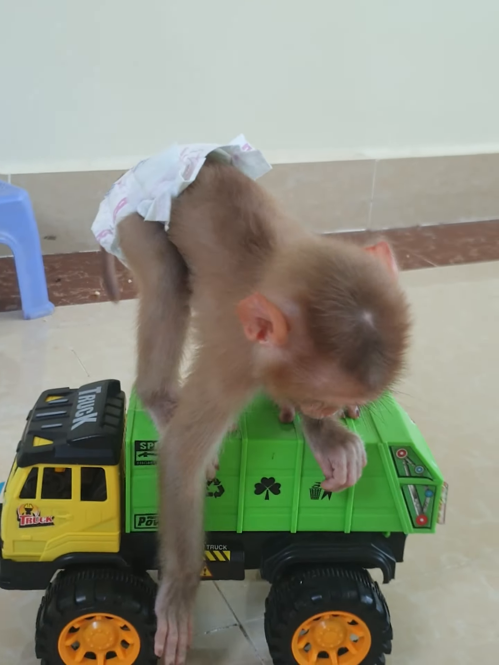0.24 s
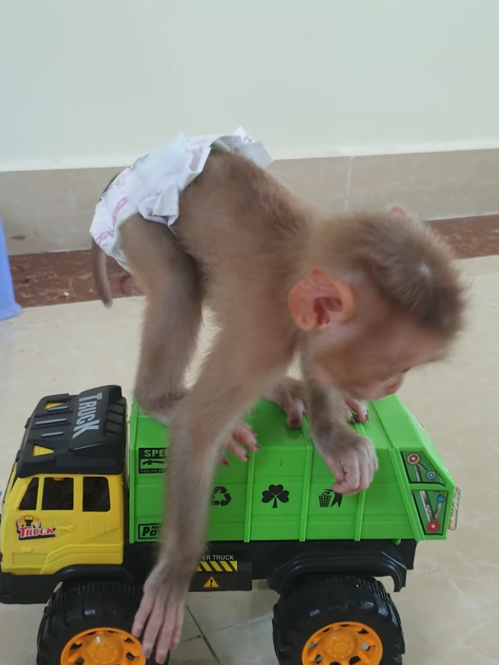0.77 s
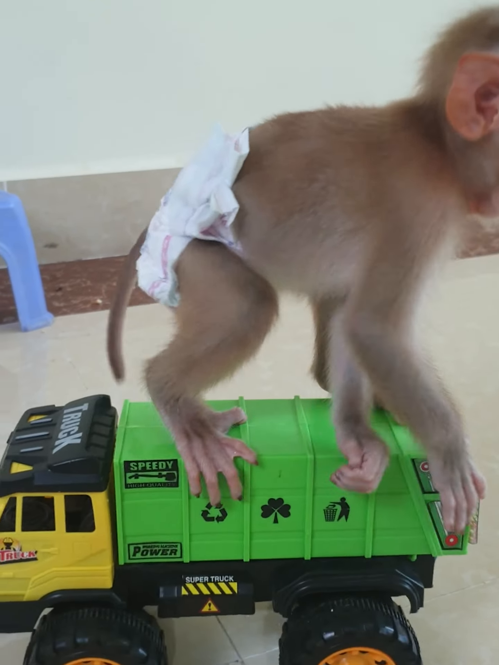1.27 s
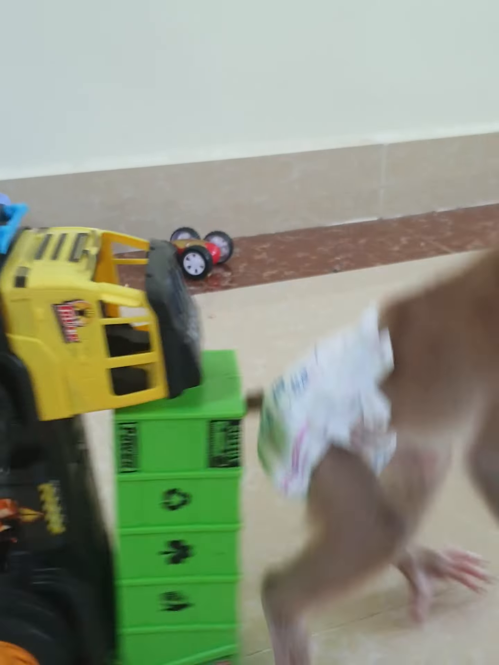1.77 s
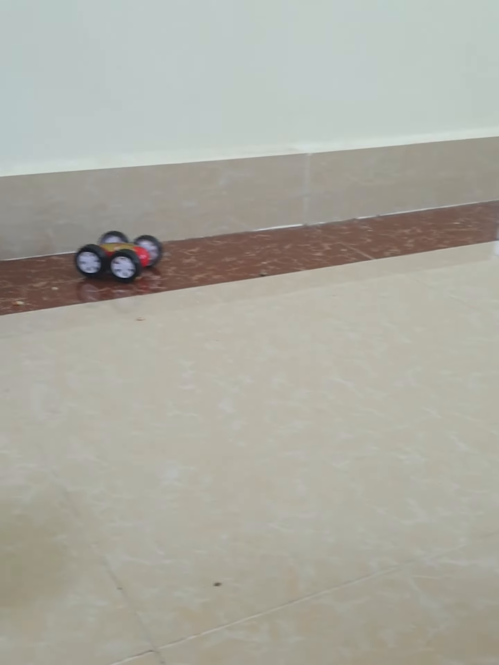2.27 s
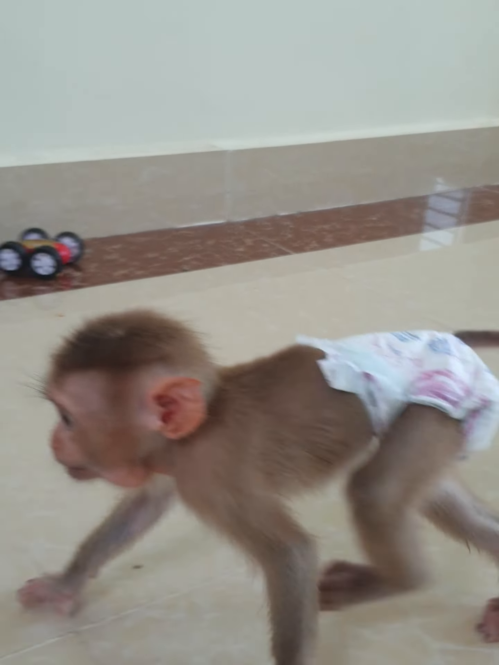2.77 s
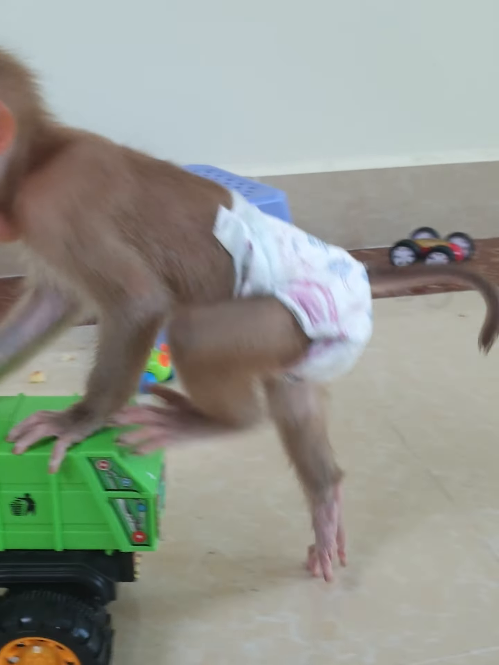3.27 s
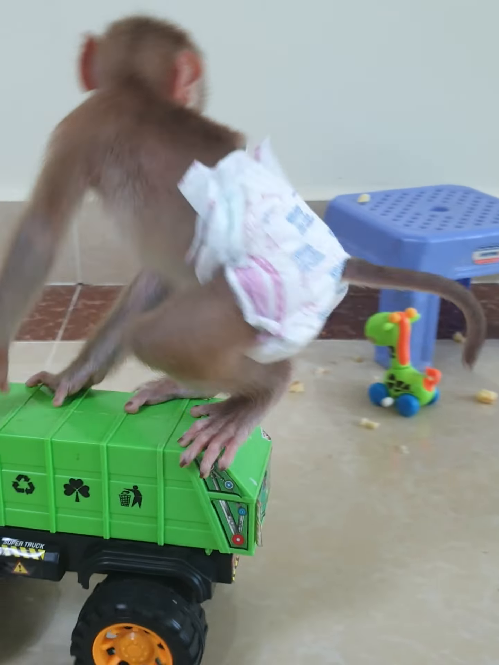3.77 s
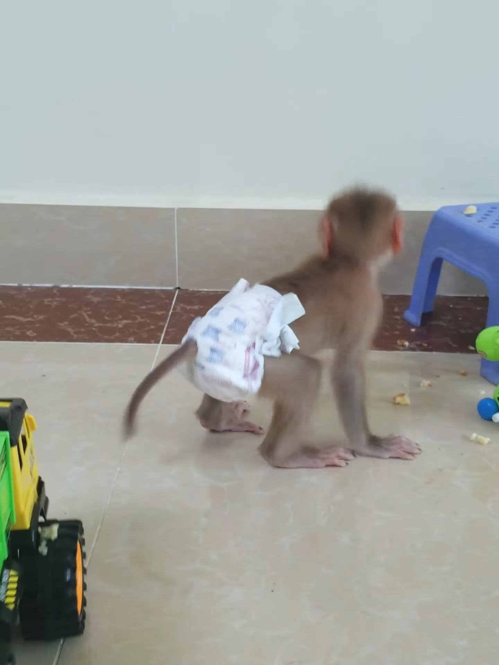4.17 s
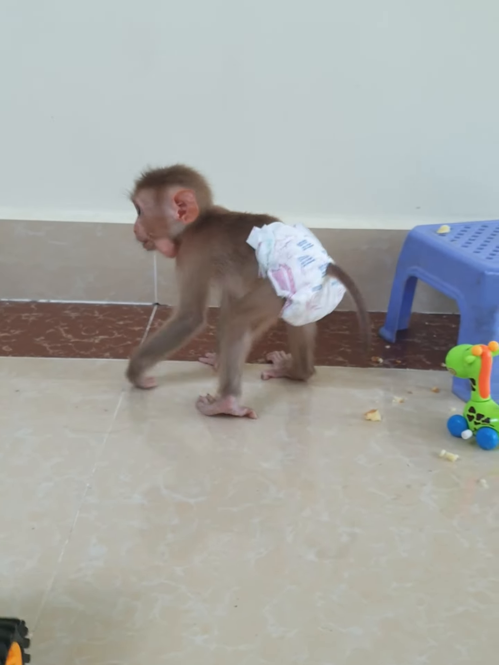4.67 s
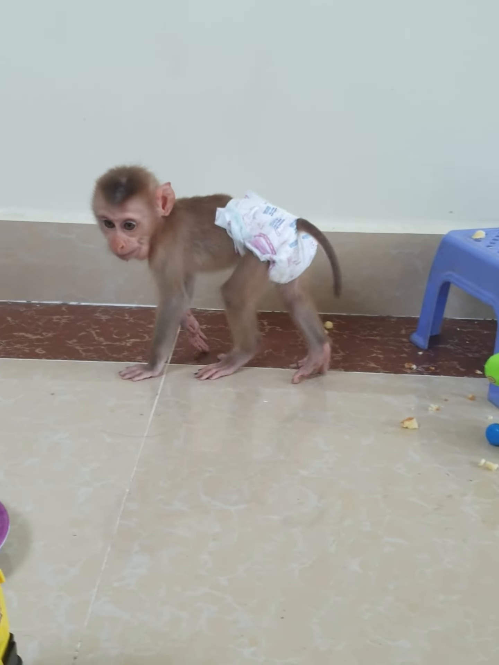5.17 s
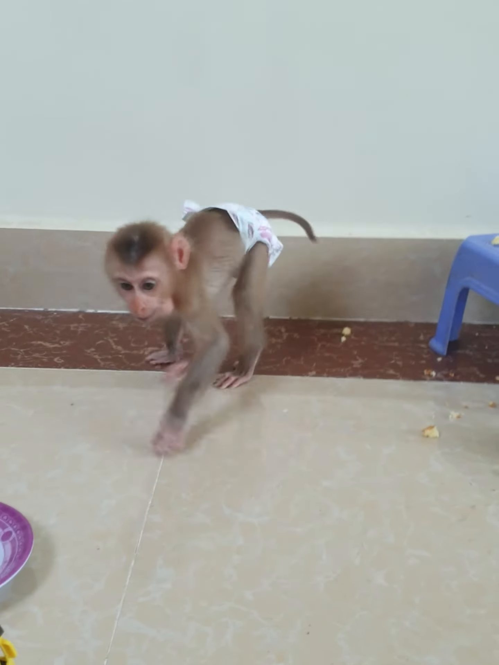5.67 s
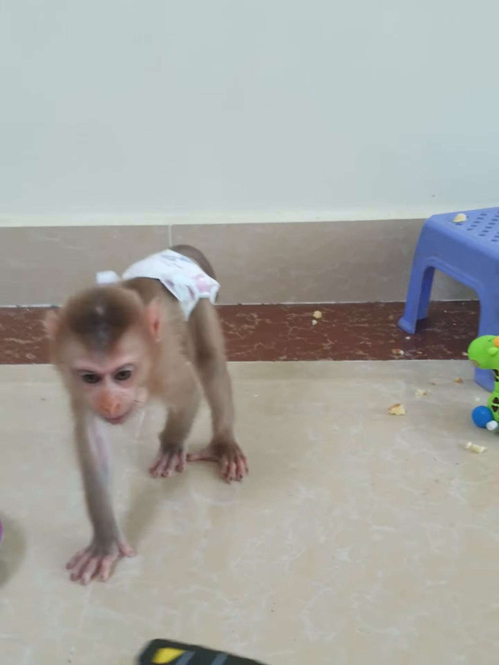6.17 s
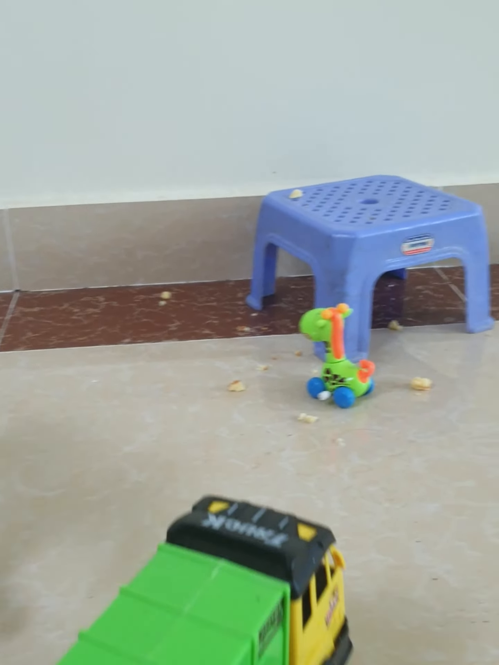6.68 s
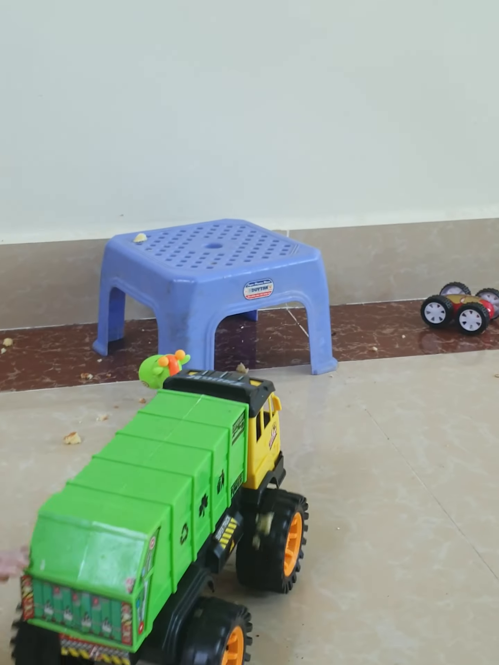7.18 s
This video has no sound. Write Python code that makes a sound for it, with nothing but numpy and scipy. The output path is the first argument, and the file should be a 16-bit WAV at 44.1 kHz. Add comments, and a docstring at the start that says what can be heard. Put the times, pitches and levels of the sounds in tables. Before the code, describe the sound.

Hollow plastic knocks and rattles ring out as a toy truck is shoved across a tiled floor, with soft handling noise between bursts.

```python
"""Toy truck on a tiled floor

A big plastic toy truck is set down, shoved and rolled in a bare, echoing room. Knocks ring its
hollow shell, a loose panel clacks and rattles, and lugged wheels rumble over the tiles.
Fingers tap and rub right at the microphone and cloth rustles, both dry and close.
A few faint, thin squeaks come through, and a low room tone lies under it all."""
import sys
import numpy as np
from scipy import signal
from scipy.fft import rfft, irfft, next_fast_len
from scipy.io import wavfile
from scipy.ndimage import uniform_filter1d

SR = 44100
rng = np.random.default_rng(int(sys.argv[2]) if len(sys.argv) > 2 else 0)


def materialize(psi):
    """Save the field psi as 16-bit PCM at rate SR to the path in sys.argv[1].

    A 1-D psi becomes a single channel; in a 2-D psi each row is a channel.
    """
    bounded = np.clip(np.atleast_2d(psi).T, -1, 1)
    quanta = np.round(bounded * 32767).astype(np.int16)
    wavfile.write(sys.argv[1], SR, quanta)


N = 328104
TIME = np.arange(N) / SR

# colour of the room tone (frequency [Hz], density [dB])
ROOM_TONE = [(15, -58.5), (28, -32.5), (45, -5), (72, -2.5), (130, -8), (220, -12.5), (320, -19.5),
             (450, -19.5), (700, -27), (1300, -36.5), (2600, -49), (4400, -52.5), (8000, -58), (12000, -52),
             (16000, -52.5)]
# its fader ride (time [s], level [dB])
ROOM_TONE_RIDE = [(0.0, -49.5), (1.24, -51.5), (1.8, -46), (2.46, -48), (2.69, -55.5), (5.39, -49),
                  (5.82, -51.5), (6.4, -46.5), (7.44, -48)]
# reverb decay (frequency [Hz], time to fall 60 dB [s])
ROOM_T60 = [(100, 0.93), (400, .9), (1000, 0.81), (2500, 0.79), (5000, 0.69), (9000, 0.7), (15000, .55)]
# colour of the walls (frequency [Hz], level [dB])
WALLS = [(60, 1), (250, -1.5), (800, -1.5), (2500, -0.5), (8000, 0), (16000, 3)]
# how alike left and right are (frequency [Hz], correlation [0-1])
LIKENESS = [(100, 0.89), (350, 0.94), (700, 0.58), (1300, 0.033), (4000, 0.027), (16000, .02)]

# colours of three kinds of cloth stroke (frequency [Hz], density [dB])
CLOTH_SLIDE = [(880, -29), (1500, -5.5), (2490, -11), (3150, -3), (4830, -13.5), (6120, -4), (7610, -11.5),
               (10900, -8), (16000, -13)]
CLOTH_BRUSH = [(2060, -21), (3500, -16), (4970, 1), (5710, -3), (6120, 3), (7800, -1), (11300, 2.5),
               (16000, -6)]
CLOTH_SWISH = [(1470, -44), (2500, -17.5), (2850, -10.5), (3490, -30), (3890, -12.5), (5610, -11.5),
               (6810, -3.5), (14700, -16), (16000, -23)]
# cloth strokes (time [s], rise [s], length [s], level [dB], kind)
STROKES = [(3.15, .03, 0.13, -73, "slide"), (3.278, 0.12, 0.39, -61.5, "slide"),
           (4.668, .02, 0.12, -72.5, "brush"), (4.816, 0.024, 0.029, -67.5, "brush"),
           (4.961, .08, 0.16, -62.5, "brush"), (5.16, .03, 0.12, -74.5, "brush"),
           (5.82, 0.18, 0.44, -61, "swish"), (6.183, .01, 0.032, -60, "brush"),
           (6.283, 0.019, 0.016, -55, "brush")]
# short squeaks (time [s], pitch [Hz], level [dB])
CHIRPS = [(0.311, 3550, -67), (0.327, 3430, -63), (0.357, 3460, -59.5), (2.937, 3617, -73.5)]

# borders of the five registers: bass, body, clack, snap, crack (frequency [Hz])
REGISTER_EDGES = [60, 450, 1300, 2900, 6500, 16000]
# top end of a tap and of a knock, against the body (clack [dB], snap [dB], crack [dB])
TAP_BALANCE = [-2, -15, -21]
KNOCK_BALANCE = [-6, -11.5, -19.5]
# balance of a panel clack (bass [dB], body [dB], clack [dB], snap [dB], crack [dB])
CLACK_BALANCE = [-16, -7.5, -0.5, -9.5, -14]

# colours of a fingertip tap and of rubbing skin (frequency [Hz], density [dB])
TAP_COLOUR = [(60, -16), (200, 6.5), (380, -3), (530, 3.5), (740, -11.5), (1050, -5), (2800, 0),
              (3700, -13.5), (6000, -15), (8000, -16), (13000, -2), (16000, -20)]
RUB_COLOUR = [(60, 7.5), (150, 2.5), (380, -5.5), (520, -3.5), (750, -16), (1050, -5), (1600, -6.5),
              (2600, -3.5), (3200, -12.5), (4000, -19), (7000, -26.5), (16000, -29)]
# finger taps (time [s], level [dB], hardness [dB/register], bass [dB], left against right [dB])
TAPS = [(4.689, -52.5, 0.5, -3, -10), (4.715, -50, -8, -6, -12), (4.742, -57, -0.5, -6, -18),
        (4.971, -55, -1.5, -4, -3), (5.398, -42.5, -0.5, 8, -22), (5.433, -40.5, 0, 5.5, -23),
        (5.459, -28.5, -2, -8, -24), (5.47, -53, 5, 4, -5), (5.525, -49, 2.5, 7, -7),
        (5.66, -76.5, 8, 13, -5)]
# skin rubs (time [s], rise [s], length [s], time to fade 20 dB [s], level [dB])
RUBS = [(4.657, 0.027, 0.11, .15, -69), (4.803, 0.037, 0.055, 0.13, -60.5), (4.96, 0.11, 0.13, 0.21, -51),
        (5.16, 0.065, 0.073, 0.12, -60.5), (5.374, 0.028, 0.15, 0.048, -59.5),
        (5.444, 0.015, 0.015, 0.019, -34.5)]

# colours of rolling tread, loose parts and plastic hitting tile (frequency [Hz], density [dB])
ROLL_COLOUR = [(70, -19.5), (150, -3), (400, 4), (580, 2), (720, -6.5), (900, 7), (1200, -6), (1500, -12),
               (2200, -11.5), (3400, -17), (4200, -20), (6000, -23), (9000, -22.5), (12000, -26),
               (16000, -39)]
RATTLE_COLOUR = [(150, -11.5), (450, 11.5), (1200, 5.5), (2200, -12), (3200, -4.5), (4500, -4.5),
                 (7000, -16), (11000, -7), (16000, -16)]
SNAP_COLOUR = [(60, -13), (150, 11), (280, -1), (390, -4), (700, 0.5), (1800, -6), (3200, -7.5),
               (5500, -11), (8500, -14.5), (12000, -13.5), (16000, -20)]
# modes of the hollow shell and of the loose panel (frequency [Hz], width [Hz], level [dB])
SHELL_MODES = [(74, 6.2, 16.5), (112, 25, 3.5), (252, 99, 9), (304, 36, 8), (418, 25, -5.5), (570, 40, 6.5),
               (624, 30, 7.5), (685, 150, 5.5), (792, 30, 2.5), (835, 28, -2), (997, 78, 5),
               (1170, 140, -1), (1454, 46, 3), (1590, 170, 5), (1790, 25, -4.5), (1914, 80, -2),
               (2614, 170, -4.5), (3067, 120, -5), (4290, 680, 0)]
PANEL_MODES = [(1027, 55, 2.5), (1567, 53, 8), (1850, 130, 8), (2050, 84, 10), (2650, 200, 5.5),
               (3580, 66, 1), (4070, 130, 8), (4800, 90, -2.5), (6020, 370, 8)]
# pushes that roll the wheels, shoves that shake the panel (time [s], length [s], level [dB])
PUSHES = [(1.273, .08, -57.5), (1.657, 0.11, -40.5), (6.308, 0.042, -54), (6.625, 0.41, -40),
          (7.15, 0.36, -52.5)]
SHOVES = [(3.522, 0.069, -47), (3.753, 0.058, -43.5), (3.91, 0.17, -46.5), (4.13, .14, -56.5)]
# panel clacks (time [s], level [dB], hardness [dB/register], room send [dB])
CLACKS = [(1.075, -44.5, -8.5, 2), (2.273, -21, -2, 7), (2.392, -27, 0, 4.5), (3.428, -43.5, -12.5, 0),
          (3.583, -25, -0.5, -2), (3.624, -30.5, -0.5, 4.5), (3.69, -28.5, -0.5, 1), (3.745, -27, 0, 1),
          (3.867, -38.5, -1.5, 3), (3.909, -35.5, 0.5, 1.5), (3.971, -34.5, -9, -14), (4.003, -34, 1, 1),
          (4.069, -44.5, 2.5, -2.5), (4.165, -53.5, 5, -4), (4.274, -51.5, 1, -14), (6.426, -48, 0.5, -12),
          (6.496, -49.5, -2, -20), (6.55, -47.5, -2.5, -3.5), (7.032, -53, -2.5, -10)]
# shell knocks on tile (time [s], level [dB], hardness [dB/register], bass [dB], room send [dB])
KNOCKS = [(1.072, -52.5, 0.5, 10.5, -2.5), (1.483, -46, -4, -7, 4.5), (1.692, -44.5, -4.5, 5, 6.5),
          (1.725, -34.5, -2.5, -8, -8), (1.765, -11, -1.23, -12, -2.5), (1.797, -23, -2, -14, -5.5),
          (1.818, -22.5, -4, -19, 0.5), (1.901, -28, 0, -3, -19), (2.011, -26.5, 2, -7, -2.5),
          (2.057, -34.5, 3, -17, -4.5), (2.273, -18, 4.5, -14, -4), (2.295, -23.5, -7, 2, -13),
          (2.334, -24.5, -16, -4, -1), (2.425, -30.5, 1, -25, 5.5), (3.05, -59.5, -3, 17.5, 3),
          (3.171, -56, -3, 5.5, 4.5), (5.84, -50, -1, 2, 9), (6.193, -46, 2.5, 1, 3),
          (6.332, -33, 2.5, 1, -4.5), (6.352, -40, 0.5, -9.5, -1.5), (6.405, -43, -2, 8.5, -2),
          (6.458, -41, -5, 0, 1), (6.698, -45, 3, -8, 0.5), (6.729, -33, -0.5, -18, -2.5),
          (6.802, -32.5, 0.5, -21, 1.5), (6.944, -36.5, -1.5, -5.5, 0.5), (7.003, -43, 0, -9, 3.5),
          (7.083, -38.5, -3, -18, -10.5), (7.161, -45.5, 2, 0.5, -4)]


def from_db(db):
    """Decibels to gain."""
    return 10 ** (np.asarray(db) / 20)


def rms_one(x):
    """Scale to rms 1."""
    return x / np.sqrt(np.mean(x ** 2) + 1e-20)


def at_hz(points, hz):
    """Read a curve on a log-frequency axis."""
    f, value = np.transpose(points)
    return np.interp(np.log(np.maximum(hz, 1)), np.log(f), value)


def add(out, sound, s):
    """Mix a sound in at time s."""
    i = max(int(s * SR), 0)
    out[:, i:i + sound.shape[1]] += sound[:, :N - i]


def band(x, low_hz, high_hz):
    """Gentle band-pass."""
    return signal.sosfilt(signal.butter(2, [low_hz, high_hz], "band", fs=SR, output="sos"), x)


def resonate(x, hz, width_hz):
    """One resonance, unity gain at its peak."""
    r = np.exp(-np.pi * width_hz / SR)
    poles = [1, -2 * r * np.cos(2 * np.pi * hz / SR), r * r]
    return signal.lfilter(np.array([1, 0, -1]) * (1 - r * r) / 2, poles, x + 1e-18)


def colour(x, spectrum):
    """Apply an EQ curve."""
    n = next_fast_len(x.shape[-1])
    gain = from_db(at_hz(spectrum, np.arange(n // 2 + 1) * SR / n))
    return irfft(rfft(x, n) * gain, n)[..., :x.shape[-1]]


def click(spectrum, size):
    """A single impulse through an EQ curve."""
    return colour(1.0 * (np.arange(size) == 16), spectrum)


def noise(spectrum, size=N, direct=0):
    """Coloured stereo noise, narrow in the bass and wide on top; direct pulls it to the centre."""
    n = next_fast_len(size)
    mid, side = rfft(rng.standard_normal((2, n)))
    alike = np.clip(direct + (1 - direct) * at_hz(LIKENESS, np.arange(len(mid)) * SR / n), 0, 1)
    stereo = irfft(np.sqrt(1 + alike) * mid + np.sqrt(1 - alike) * side * [[1], [-1]], n)
    return rms_one(colour(stereo, spectrum)[:, :size])


def grains(per_s, spread_db, grain_s):
    """Envelope of many small random contacts of uneven strength; rms 1."""
    contacts = rng.random(N) < per_s / SR
    energy = contacts * from_db(2 * spread_db * np.minimum(rng.exponential(1, N), 3))
    return rms_one(np.sqrt(signal.lfilter([1], [1, -np.exp(-1 / (grain_s * SR))], energy + 1e-18)))


def swell(start_s, rise_s, length_s, fade_s):
    """Envelope of one move: it builds, holds until length_s, then drops 20 dB every fade_s."""
    t = TIME - start_s
    return np.clip(t / rise_s, 0, 1) * from_db(-20 * np.clip((t - length_s) / fade_s, 0, 10))


def registers(db, hardness_db, balance_db):
    """Levels from bass to crack: hardness tilts each register above the body by one more step."""
    return db + np.array(balance_db) + hardness_db * np.maximum(np.arange(len(balance_db)) - 1, 0)


def voiced(hit, levels_db):
    """Where and how hard a blow lands sets the level of five registers in its first 12 ms."""
    out = 0
    for low, high, db in zip(REGISTER_EDGES, REGISTER_EDGES[1:], levels_db):
        part = band(hit, low, high)
        out = -out + part * from_db(db) / np.std(part[:, :int(.012 * SR)])   # alternate polarity
    return out


def ringing(x, modes, plain, vary_db):
    """Plastic rings on top of the plain contact sound; each contact point favours other modes."""
    offsets_db = vary_db * rng.standard_normal(len(modes))
    return plain * x + sum(from_db(db + offset) * resonate(x, hz, width)
                           for (hz, width, db), offset in zip(modes, offsets_db))


def patter(spectrum, shared, **texture):
    """Small contacts: some sound in every register, most in only one; rms 1."""
    source, common = noise(spectrum, direct=.3), grains(**texture)
    out = 0
    for k, (low, high) in enumerate(zip(REGISTER_EDGES, REGISTER_EDGES[1:])):
        envelope = shared * common + (1 - shared) * grains(**texture)
        out = out + (-1) ** k * band(source, low, high) * envelope
    return rms_one(out)


def room_tone():
    """A bed of low noise that drifts in level and leans a little to the right."""
    ride_db = np.interp(TIME, *np.transpose(ROOM_TONE_RIDE))
    return noise(ROOM_TONE) * from_db(ride_db) * from_db([[-0.8], [1.7]])


def reverb(send, early_db, build_s):
    """Hard walls: a dense tail that builds quickly and dies sooner in the treble."""
    t, hz = TIME[:SR], np.arange(SR // 2 + 1)
    spectrum = rfft(noise(WALLS, size=SR))
    edges_hz = [0, 180, 400, 800, 1600, 3200, 5500, 8000, 11500, SR]
    tail = 0
    for low, high in zip(edges_hz, edges_hz[1:]):
        t60 = at_hz(ROOM_T60, min((low + high) / 2, 14000))
        tail = tail + irfft(spectrum * ((hz >= low) & (hz < high)), SR) * from_db(-60 * t / t60)
    tail = tail * (1 - np.exp(-t / build_s)) * (1 + from_db(early_db) * np.exp(-t / 0.031))
    return signal.fftconvolve(send, tail / np.sqrt(np.sum(tail ** 2) / 2), axes=1)[:, :N]


def cloth(gain_db, brush_pan_db, swish_pan_db):
    """Soft strokes of fabric: the fibres give a fine-grained hiss."""
    kinds = [("slide", CLOTH_SLIDE, 0), ("brush", CLOTH_BRUSH, brush_pan_db),
             ("swish", CLOTH_SWISH, swish_pan_db)]
    hiss = {kind: noise(spectrum) * from_db([[pan / 2], [-pan / 2]]) for kind, spectrum, pan in kinds}
    fibres = grains(per_s=920, spread_db=2.0, grain_s=0.004)
    return fibres * sum(hiss[kind] * from_db(gain_db + db) * swell(s, rise, length, fade_s=0.064)
                        for s, rise, length, db, kind in STROKES)


def short_squeaks(octave_db, rasp):
    """Tiny chirps: a tone and its octave, roughened by pitch jitter."""
    out, t = np.zeros((2, N)), TIME[:SR // 80]
    for s, hz, db in CHIRPS:
        phase = 2 * np.pi * np.cumsum(hz * (1 + rasp * rng.standard_normal(len(t)))) / SR
        tone = np.sin(phase) + from_db(octave_db) * np.sin(2 * phase)
        add(out, tone * np.hanning(len(t)) * from_db([[db], [db]]), s - t[-1] / 2)
    return out


def thin_squeak(start_s, length_s, top_hz, rasp, waver):
    """A very high, raspy squeak that arches in pitch, with a weaker tone on either side."""
    top_after_s, bend_hz_per_s2 = .135, 22000
    hz = top_hz - bend_hz_per_s2 * np.minimum(abs(TIME - start_s - top_after_s), length_s) ** 2
    fast, slow = rng.standard_normal((2, N))
    jitter = rasp * rms_one(uniform_filter1d(fast, size=12))
    drift = waver * rms_one(uniform_filter1d(slow, size=700))
    phase = 2 * np.pi * np.cumsum(hz * (1 + jitter + drift)) / SR
    tones = np.sin(phase) + from_db(-8) * np.sin(.915 * phase) + from_db(-12) * np.sin(1.025 * phase)
    catching = grains(per_s=160, spread_db=3.0, grain_s=.004)
    envelope = swell(start_s, rise_s=0.027, length_s=length_s, fade_s=0.21)
    return tones * catching * envelope * from_db([[-67], [-78]])


def fingers(tap_db, rub_db, thump_db, thump_hz, rub_pan_db, grit):
    """Fingertips tick with a short low thump and skin rubs grittily, mostly on the right."""
    out, t = np.zeros((2, N)), TIME[:SR // 16]
    spike = click(TAP_COLOUR, len(t))
    for s, db, hardness_db, bass_db, pan_db in TAPS:
        tick = -spike / spike.max() + grit * noise(TAP_COLOUR, size=len(t)) * np.exp(-t / 0.0072)
        thump = np.sin(2 * np.pi * thump_hz * t) * np.exp(-t / 0.0099)
        tap = voiced(tick, registers(db, hardness_db, [bass_db, 0, *TAP_BALANCE]))
        tap += from_db(db + bass_db + thump_db) * thump
        add(out, tap * from_db([[tap_db + pan_db], [tap_db]]), s)
    pressure = sum(from_db(db) * swell(*timing) for *timing, db in RUBS)
    rub = noise(RUB_COLOUR) * grains(per_s=540, spread_db=-2.5, grain_s=0.0073) * pressure
    return out + rub * from_db([[rub_db + rub_pan_db], [rub_db]])


def tyre_skid(judder_db, judder_hz, squeal_db, squeal_hz):
    """On the last shove a tyre judders on the tile, and a faint, narrow squeal lingers."""
    judder = rms_one(resonate(noise(ROLL_COLOUR), judder_hz, width_hz=18))
    judder *= swell(start_s=4.157, rise_s=.015, length_s=0.1, fade_s=0.2)
    squeal = resonate(noise(RATTLE_COLOUR), squeal_hz, width_hz=260)
    squeal = rms_one(resonate(squeal, squeal_hz, width_hz=260))
    squeal *= swell(start_s=4.35, rise_s=0.29, length_s=0.38, fade_s=.09)
    return from_db(judder_db) * judder + from_db(squeal_db) * squeal


def wheels(roll_db, tick_db, top_hz):
    """Tread lugs patter and tick through the shell; each push gets up to speed, then coasts."""
    pushes = sum(from_db(db) * swell(s, 0.058, length, fade_s=0.17) for s, length, db in PUSHES)
    lugs = patter(ROLL_COLOUR, shared=.25, per_s=120, spread_db=3.0, grain_s=0.002)
    roll = rms_one(ringing(lugs, SHELL_MODES, plain=6.8, vary_db=-0.5))
    snaps = band(noise(SNAP_COLOUR, direct=.3), 400, 5000)
    snaps *= grains(per_s=45, spread_db=6.5, grain_s=0.001)
    ticks = rms_one(ringing(snaps, SHELL_MODES, plain=0.98, vary_db=-0.5))
    tread = from_db(roll_db) * roll + from_db(tick_db) * ticks
    return signal.sosfilt(signal.butter(6, top_hz, fs=SR, output="sos"), tread) * pushes


def panel_rattle(gain_db):
    """Each shove shakes the loose panel into a rattle that builds and settles."""
    shoves = sum(from_db(db) * swell(s, 0.03, length, fade_s=0.1) for s, length, db in SHOVES)
    contacts = patter(RATTLE_COLOUR, shared=0.51, per_s=130, spread_db=4.0, grain_s=0.0025)
    return from_db(gain_db) * rms_one(ringing(contacts, PANEL_MODES, plain=1.0, vary_db=4.5)) * shoves


def impacts(hits, modes, gain_db, send_db, pan_db, attack_db, chatter_s, t60_s, plain, room_plain):
    """A sharp attack, a few ms of chatter as parts meet, then ringing. Returns dry sound and send."""
    near, send, t = np.zeros((2, N)), np.zeros((2, N)), TIME[:SR // 7]
    envelope = from_db(-60 * np.maximum(t - chatter_s, 0) / t60_s)
    attack = rms_one(click(SNAP_COLOUR, len(t))) * np.sqrt(np.mean(envelope ** 2))
    for s, levels_db, room_db in hits:
        chatter = noise(SNAP_COLOUR, size=len(t), direct=0.22) * envelope
        hit = ringing(chatter + from_db(attack_db) * attack, modes, plain, vary_db=1.5)
        add(near, voiced(hit, levels_db) * from_db([[gain_db + pan_db / 2], [gain_db - pan_db / 2]]), s)
        # the walls gather sound from all faces of the toy, which evens out its colour
        radiated = ringing(attack + 0.77 * chatter, modes, room_plain, vary_db=1.5)
        add(send, voiced(radiated, levels_db) * from_db(gain_db + room_db + send_db), s)
    return np.array([near, send])


def panel_clacks():
    """The loose panel strikes and rings with a bright clack."""
    hits = [(s, registers(db, hardness_db, CLACK_BALANCE), room_db)
            for s, db, hardness_db, room_db in CLACKS]
    return impacts(hits, PANEL_MODES, gain_db=-2.5, send_db=-0.5, pan_db=-1.0, attack_db=-16.5,
                   chatter_s=0.0046, t60_s=0.02, plain=1.7, room_plain=2.01)


def shell_knocks():
    """The truck hits the tiles and its hollow shell rings."""
    hits = [(s, registers(db, hardness_db, [bass_db, 0, *KNOCK_BALANCE]), room_db)
            for s, db, hardness_db, bass_db, room_db in KNOCKS]
    return impacts(hits, SHELL_MODES, gain_db=-3.5, send_db=0.0, pan_db=1.0, attack_db=-13.5,
                   chatter_s=0.0029, t60_s=0.023, plain=0.8, room_plain=3.3)


def truck():
    """Knocks, clacks, wheels and rattle on one bus. Returns dry sound and room send."""
    near, send = shell_knocks() + panel_clacks()
    movement = wheels(roll_db=-2.5, tick_db=-8.0, top_hz=11300) + panel_rattle(gain_db=-0.5)
    left, right = near + movement
    left = np.roll(left, 4)   # the truck reaches the left side a little later
    return np.array([left, right]), send + from_db(-3.0) * movement


def scene():
    """Truck and squeaks feed the reverb; skid, fingers, cloth and room tone stay dry."""
    toy, send = truck()
    short = short_squeaks(octave_db=-2.5, rasp=0.27)
    thin = thin_squeak(start_s=2.93, length_s=0.17, top_hz=13130, rasp=.015, waver=.007)
    send += from_db(-3.0) * short + from_db(-1.0) * thin
    echo = from_db(1.5) * reverb(send, early_db=-12.0, build_s=0.0026)
    skid = tyre_skid(judder_db=-43.5, judder_hz=137, squeal_db=-74.5, squeal_hz=2420)
    touch = fingers(tap_db=-2.0, rub_db=5.0, thump_db=7.5, thump_hz=113, rub_pan_db=-8.5, grit=0.064)
    rustle = cloth(gain_db=3.5, brush_pan_db=6.5, swish_pan_db=-5.5)
    return toy + short + thin + echo + skid + touch + rustle + room_tone()


def record(dry):
    """Master: peaks clip at full scale, then a steep high cut at 16.2 kHz."""
    return signal.sosfilt(signal.ellip(10, .1, 70, 16200, fs=SR, output="sos"), np.clip(dry, -1, 1))


dry = scene()
out = record(dry)
materialize(out)
```